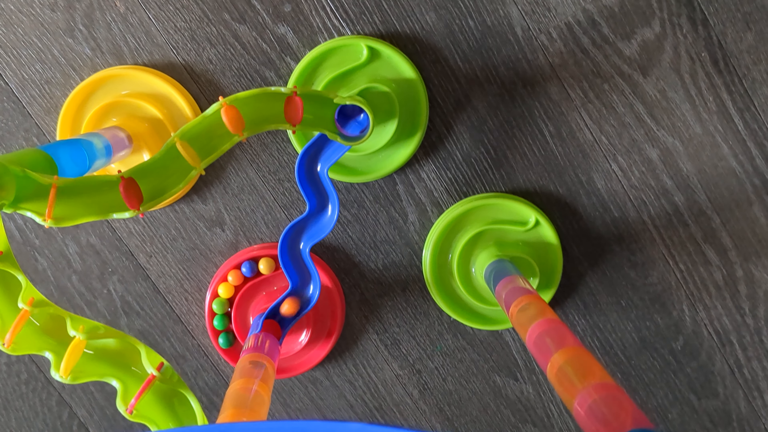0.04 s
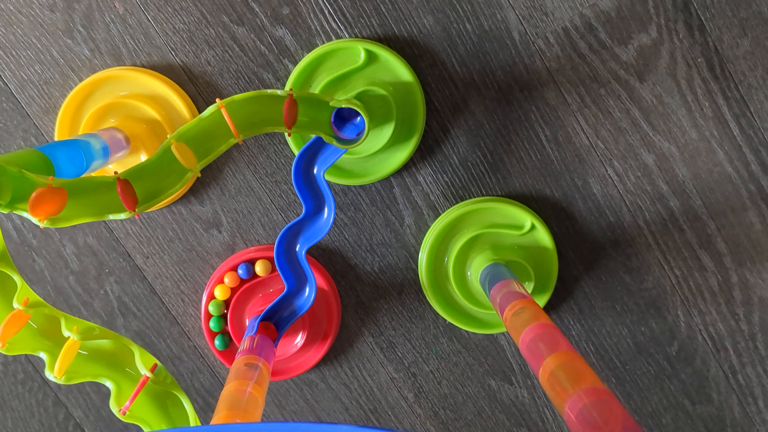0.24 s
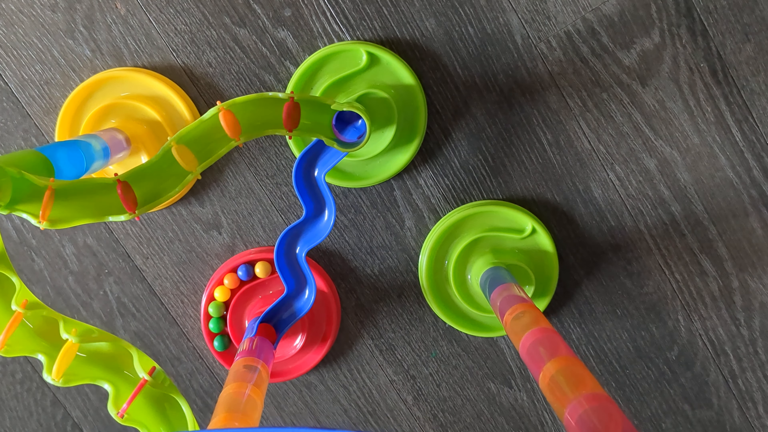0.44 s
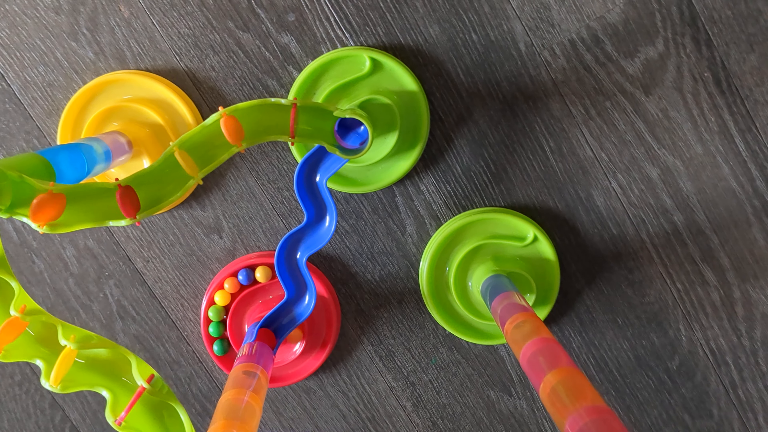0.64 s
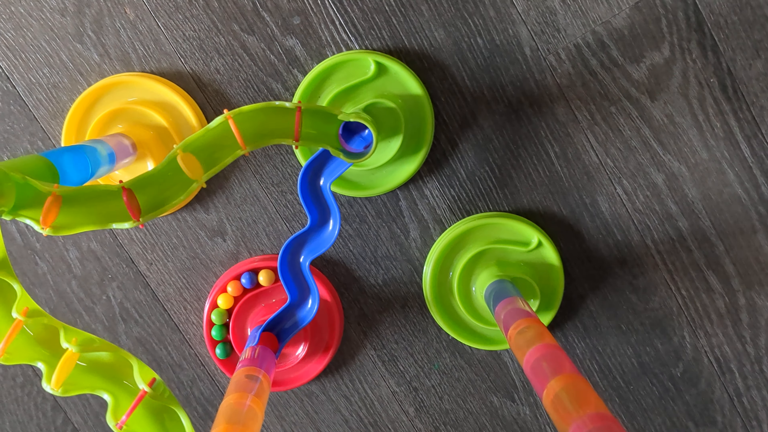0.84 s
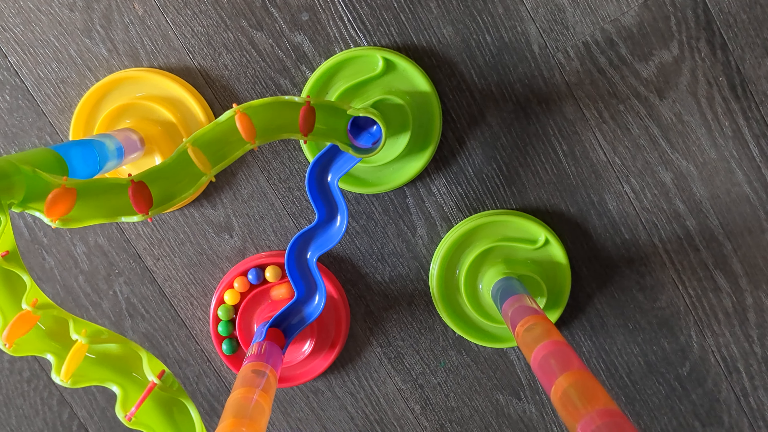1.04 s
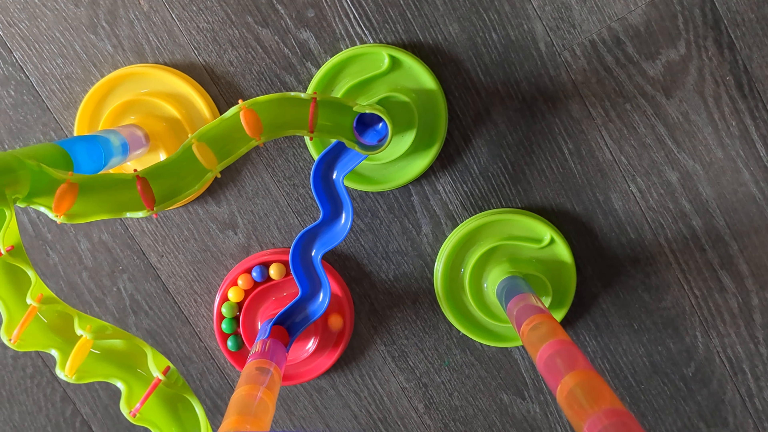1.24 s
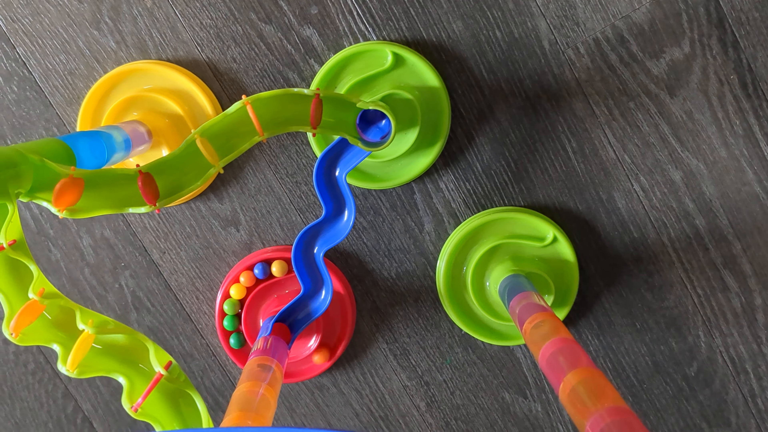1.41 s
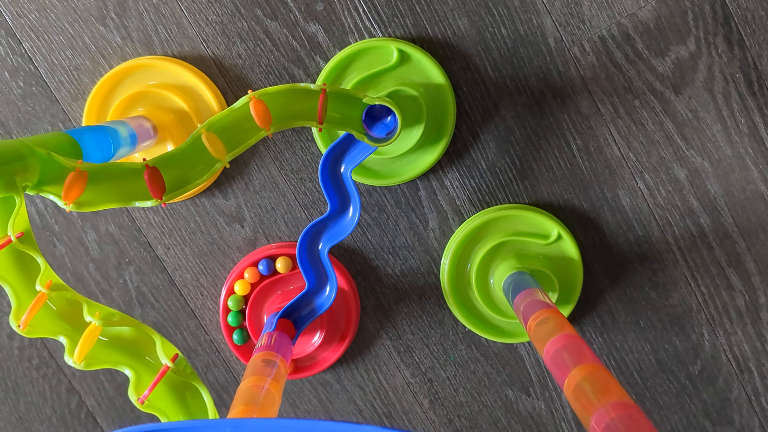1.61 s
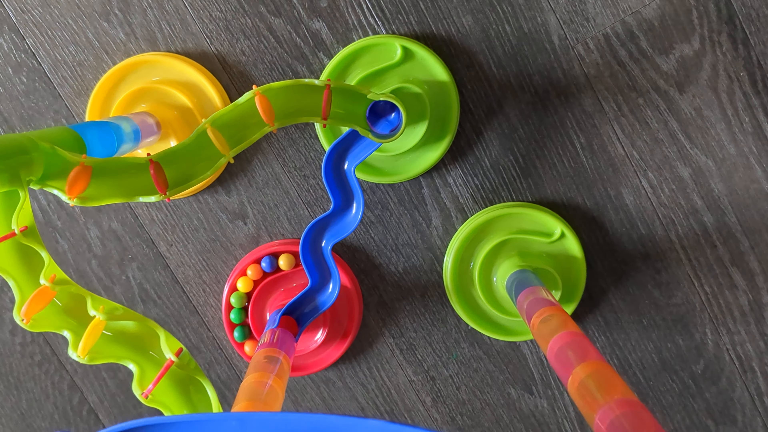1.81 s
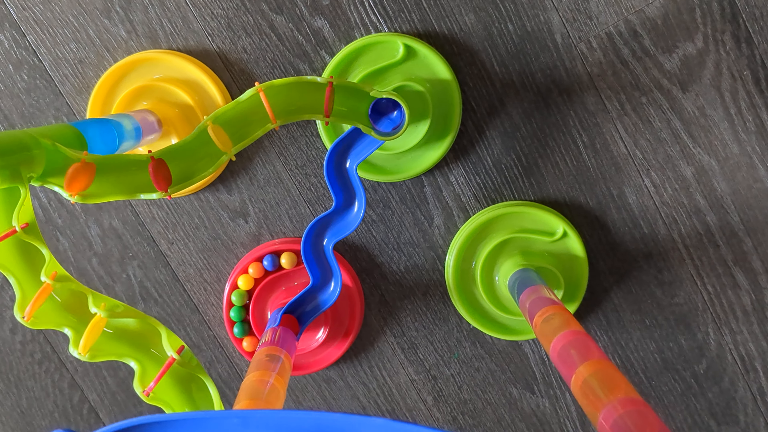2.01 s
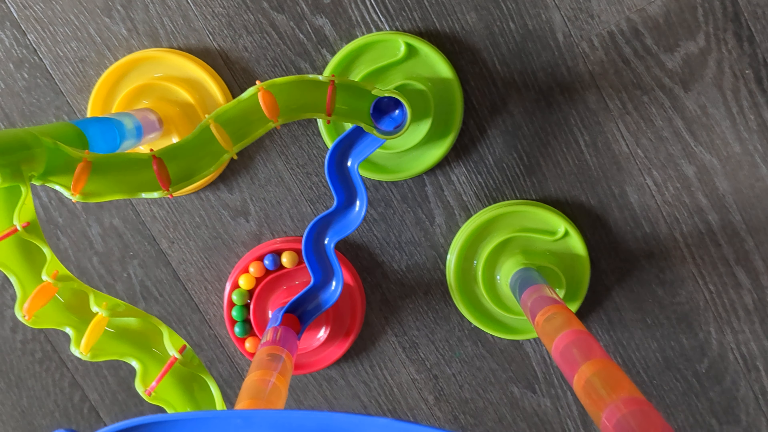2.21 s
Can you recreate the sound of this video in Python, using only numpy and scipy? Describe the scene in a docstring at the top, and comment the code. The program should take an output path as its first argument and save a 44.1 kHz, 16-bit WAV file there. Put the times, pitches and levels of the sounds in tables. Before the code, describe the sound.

Marbles roll down a plastic track, knocking, bouncing into a dish and clacking together.

```python
"""Marbles running down a plastic track on the hard floor of a small room, heard on a stereo pair.
They hum over tiny bumps in the plastic and knock across the ramp's joints. One clips the chute's rim,
drops into a dish, bounces ever faster, circles and clacks against the marbles resting there; another
drops into a hollow cup. Each blow rings the part it hits, and the near walls answer briefly."""
import sys
import numpy as np
from scipy import signal
from scipy.fft import rfft, irfft, next_fast_len
from scipy.io import wavfile
from scipy.ndimage import map_coordinates

SR = 44100
rng = np.random.default_rng(int(sys.argv[2]) if len(sys.argv) > 2 else 0)


def waveform_to_disk(signal):
    """Save audio, clipped to [-1, 1], as 16-bit WAV at the path in sys.argv[1]."""
    frames = np.transpose(np.atleast_2d(signal))
    scaled = np.clip(frames, -1, 1) * 32767
    samples = np.round(scaled).astype(np.int16)
    wavfile.write(sys.argv[1], SR, samples)


N = 103635
RADIATION_HZ = 364  # the small parts radiate little below this


def from_db(db):
    """Decibels to gain."""
    return 10 ** (np.asarray(db) / 20)


def at_hz(points, hz):
    """Read a spectrum on a log-frequency axis."""
    freqs, values = np.transpose(points)
    return np.interp(np.log(hz), np.log(freqs), values)


def on_bins(points, size):
    """Read a spectrum at every bin of an FFT."""
    return at_hz(points, np.maximum(np.arange(size // 2 + 1) * SR / size, 1))


def convolve(sound, response):
    """Pass a sound through a response."""
    return signal.fftconvolve(np.atleast_2d(sound), np.atleast_2d(response), axes=-1)[:, :N]


def minimum_phase(gains):
    """The causal response with these gains that gives up its energy soonest."""
    cepstrum = irfft(np.log(gains + 1e-9))
    i = np.arange(len(cepstrum))
    fold = np.where(i == 0, 1, 2 * (i < len(i) // 2))
    return irfft(np.exp(rfft(cepstrum * fold)))


def mic_pair(x, lag_s=.00003):
    """Sound reaches the left microphone a moment before the right."""
    late = np.arange(len(x)) - lag_s * SR
    return np.array([x, map_coordinates(x, [late], order=3, mode="grid-constant")])


# diffuse sound at the two microphones: f/Hz, correlation
LIKENESS = [(130, 0.63), (300, 0.95), (1200, 0.17), (2500, 0), (4500, 0.22), (8000, 0), (12000, 0.96)]
def noise_bands(size):
    """Yield (Hz, band): third octaves of flat noise, partly alike left and right."""
    edges = np.geomspace(20, 18000, 31)
    white = rfft(rng.standard_normal((2, size)))
    freqs = np.arange(size // 2 + 1) * SR / size
    for low, high in zip(edges, edges[1:]):
        hz = np.sqrt(low * high)
        alike = np.clip(at_hz(LIKENESS, hz), -.95, .95)
        inside = (freqs >= low) & (freqs < high)
        mid, side = irfft(white / abs(white) * inside, size) * np.sqrt(size / 2)
        yield hz, np.sqrt(1 + alike) * mid + np.sqrt(1 - alike) * np.array([side, -side])


def dying_noise(colour, t60s, rise_s, size):
    """A diffuse response: each band swells, dies away and carries the energy of its colour."""
    t, out = np.arange(size) / SR, 0
    for hz, band in noise_bands(size):
        shaped = band * (1 - np.exp(-t / rise_s)) * from_db(-60 * t / at_hz(t60s, hz))
        normalise = np.sqrt(2 * np.mean(band ** 2) / (np.sum(shaped ** 2) + 1e-20))
        out = out + shaped * normalise * from_db(at_hz(colour, hz))
    return out


def resonate(x, hz, width_hz):
    """A resonance with gain 1 at its peak."""
    r = np.exp(-np.pi * width_hz / SR)
    feedback = [1, -2 * r * np.cos(2 * np.pi * hz / SR), r * r]
    return signal.lfilter(np.array([1, 0, -1]) * (1 - r * r) / 2, feedback, x + 1e-18)


def rolling(level, tones, pitch=((0, 1),), taps_per_s=2500, spread_db=3, top_hz=7000):
    """A rolling marble taps tiny bumps at random and sets the plastic humming."""
    t, size = np.arange(N) / SR, 2 * N
    taps = (rng.random(size) < taps_per_s / SR) * rng.choice([-1, 1], size)
    taps = taps * from_db(spread_db * np.minimum(rng.exponential(1, size), 5))
    hum = sum((-1) ** k * from_db(db) * resonate(taps, hz, width)
              for k, (hz, width, db) in enumerate(tones))
    hum = signal.sosfilt(signal.butter(2, [RADIATION_HZ, top_hz], "band", fs=SR, output="sos"), hum)
    speed = np.interp(t, *np.transpose(pitch))
    hum = map_coordinates(hum, [np.cumsum(speed)], order=3)  # resampling bends the pitch
    return mic_pair(hum / hum.std() * from_db(np.interp(t, *np.transpose(level))))


def ring(modes, size=4096, spread_db=2.35):
    """Damped sines of alternating sign; their strengths vary with where the blow lands."""
    t, out = np.arange(size) / SR, 0
    for k, (hz, db, t60) in enumerate(modes):
        envelope = from_db(db + spread_db * rng.standard_normal() - 60 * t / t60)
        out = out + (-1) ** k * envelope * np.sin(2 * np.pi * hz * t)
    return out


def body(modes, colour, crack_t60_s, snap_db, low_cut_hz=RADIATION_HZ, crack_db=2, size=4096):
    """One blow: a snap and the main modes start at once, over a crack of fine, fast-dying modes."""
    gains = np.hypot(abs(rfft(ring(modes, size))), from_db(snap_db + on_bins(colour, size)))
    crack = dying_noise(colour, [(1000, crack_t60_s)], rise_s=.0002, size=size)
    response = mic_pair(minimum_phase(gains)) + from_db(crack_db) * crack
    return signal.sosfilt(signal.butter(4, low_cut_hz, "high", fs=SR, output="sos"), response)


def strike(hits, respond):
    """Contacts on one part, each with a fresh response; a softer one lasts longer and sounds duller."""
    out, k = np.zeros((2, N + SR)), np.arange(128)
    for s, db, *bright_hz in hits:
        push = (k + 1) * np.exp(-2 * np.pi * (bright_hz[0] if bright_hz else SR) * k / SR)
        blow = convolve(push / push.sum(), respond())
        start = int(s * SR)
        out[:, start:start + blow.shape[1]] += from_db(db) * blow
    return out[:, :N]


# room tone at the microphones: f/Hz, relative level/dB
ROOM_TONE = [(25, -104), (55, -31), (80, -30.5), (125, -26.5), (170, -33.5), (400, -39), (1000, -39.5),
             (3000, -37.5), (5200, -47), (7000, -44.5), (10000, -52.5), (13500, -63)]
def room_tone(hiss_db=-20, whine_db=-96):
    """Faint rumble and hiss all round, with a thin high whine."""
    hiss = sum(from_db(hiss_db + at_hz(ROOM_TONE, hz)) * band
               for hz, band in noise_bands(next_fast_len(N)))
    whine = resonate(rng.standard_normal((2, N)), hz=14900, width_hz=150)
    return hiss[:, :N] + from_db(whine_db) * whine / whine.std()


# hum of the slide: t/s, level/dB
SLIDE_ROLL = [(0, -52), (.09, -53.5), (.18, -67), (.25, -110)]
# its resonances: f/Hz, width/Hz, relative level/dB
SLIDE_TONES = [(930, 90, 1), (1680, 91, -2), (2770, 320, -2.5), (3900, 600, -13.5)]
def slide_roll():
    """Above the dish, a marble swerves down the wavy slide."""
    return rolling(SLIDE_ROLL, SLIDE_TONES)


# hum of the dish: t/s, level/dB
DISH_ROLL = [(0, -54.5), (.07, -52.5), (.14, -63), (.22, -63.5), (.7, -77), (.9, -63), (1.2, -70),
             (1.42, -60), (1.54, -53.5), (1.67, -59), (1.88, -65), (2.0, -72), (2.2, -82), (2.35, -102)]
# its resonances before the bend: f/Hz, width/Hz, relative level/dB
DISH_TONES = [(507, 88, 1.5), (669, 152, -1), (790, 102, -1)]
# their bend: t/s, pitch ratio
DISH_PITCH = [(0, 1.17), (0.152, 1.108), (1.399, 1.03), (1.651, 1.1), (1.769, .99), (1.9, 1.05)]
def dish_roll():
    """A marble circles the dish; the hum sinks as it slows."""
    return rolling(DISH_ROLL, DISH_TONES, DISH_PITCH)


# hum of the ramp: t/s, level/dB
RAMP_ROLL = [(0, -66), (.2, -74), (.45, -47.5), (.56, -62), (.6, -58), (.68, -55.5), (.8, -55.5),
             (.89, -48.5), (.96, -59), (1.05, -55.5), (1.13, -52), (1.3, -46.5), (1.4, -56), (1.5, -64),
             (1.8, -72), (2.2, -75.5), (2.35, -103)]
# its resonances: f/Hz, width/Hz, relative level/dB
RAMP_TONES = [(392, 128, -10.5), (660, 880, -14.5), (1114, 70, 5.5), (1304, 120, -2.5), (1660, 110, -9.5),
              (2280, 230, -12), (2940, 1200, -20.5), (4200, 1200, -22.5)]
def ramp_roll():
    """Marbles along the ramp set it humming in swells."""
    return rolling(RAMP_ROLL, RAMP_TONES)


# hum of the chute: t/s, level/dB
CHUTE_ROLL = [(0, -75), (.2, -80), (.8, -70), (.96, -60.5), (1.02, -53.5), (1.12, -48), (1.3, -58),
              (1.45, -65), (1.8, -71), (2.2, -72.5), (2.35, -81.5)]
# its resonances: f/Hz, width/Hz, relative level/dB
CHUTE_TONES = [(1790, 250, -0.5), (2210, 106, 7.5), (2600, 370, -10.5), (3130, 490, -7), (4060, 920, -14.5),
               (7000, 750, -19.5)]
def chute_roll():
    """A marble in the chute raises a brighter whirr."""
    return rolling(CHUTE_ROLL, CHUTE_TONES)


# knocks on the ramp: t/s, level/dB, brightness f/Hz
RAMP_HITS = [(.0015, -15, 3520), (.0188, -13.5, 5300), (.0285, -23, 4500), (.089, -16, 4300),
             (.0972, -26, 4470), (.135, -15, 2500), (.1625, -13.5, 3600), (.173, -10.5, 3470),
             (.5497, -15.5, 2220), (.5725, -19, 2500), (.6163, -10.5, 4200), (.637, -10.5, 3220),
             (.6498, -8, 5650), (.6615, -12, 7000), (.670, -24, 5000), (.7665, -19.5, 4200),
             (.868, -18.5, 4200), (1.0815, -5.5, 6000), (1.094, -15, 4000), (1.111, -12, 3800),
             (1.1345, -10.5, 2800), (1.1425, -31, 2800), (1.2385, -8.5, 2280), (1.2605, -5, 2600),
             (1.2738, -2.5, 2800), (1.291, -7, 2250), (1.303, -8.5, 2500), (1.5183, -20.5, 2210)]
# its modes: f/Hz, relative level/dB, t60/s
RAMP_MODES = [(593, -37.5, 0.058), (1082, -28.5, 0.027), (1237, -21, 0.018), (1364, -20.5, 0.019),
              (1723, -34.5, 0.041), (2255, -30.5, 0.028), (2897, -31, 0.013), (3850, -30, 0.014),
              (4500, -36, 0.044)]
# its crack: f/Hz, relative level/dB
RAMP_CRACK = [(200, -30.5), (700, -19.5), (2000, 0), (4500, -0.5), (5700, -10.5), (8000, -14),
              (11500, -13.5), (16000, -39.5)]
def ramp_knocks():
    """Marbles knock over the joints of the ramp."""
    return strike(RAMP_HITS, lambda: body(RAMP_MODES, RAMP_CRACK, crack_t60_s=.0236, snap_db=-4.5))


# clicks on the rim: t/s, level/dB
RIM_HITS = [(.2238, -4), (.2493, -7.5), (.279, -7)]
# its modes: f/Hz, relative level/dB, t60/s
RIM_MODES = [(996, -26.5, 0.014), (1340, -26, 0.064), (1870, -21.5, 0.019), (2500, -24, 0.0074),
             (3220, -35, 0.0067), (3680, -39, 0.01)]
# its crack: f/Hz, relative level/dB
RIM_CRACK = [(200, -35), (1000, -15), (4000, 11.5), (5700, -12), (9000, -11.5), (12500, -14), (16000, -43)]
def rim_clicks():
    """A marble clips the rim of the chute with a hard snap."""
    return strike(RIM_HITS, lambda: body(RIM_MODES, RIM_CRACK, crack_t60_s=.021, snap_db=2.5))


# bounces in the dish: t/s, level/dB, brightness f/Hz
DISH_HITS = [(.2573, -2, 11700), (.3069, -7, 11300), (.3594, -10.5, 11500), (.3978, -12.5, 7600),
             (.4255, -15.5, 6350), (.4452, -18, 8000), (.4595, -23, 7000), (.4705, -32, 5000)]
# its modes: f/Hz, relative level/dB, t60/s
DISH_MODES = [(363, -49.5, 0.025), (596.6, -27.5, 0.074), (1097, -14.5, 0.023), (1332, -5.5, 0.014),
              (1606, -15, 0.019), (1775, -16, 0.033), (2270, -18.5, 0.044), (2560, -15, 0.017),
              (2800, -16, 0.015), (3143, -13.5, .018), (4000, -14, 0.012), (4250, -18.5, .009),
              (4813, -20, 0.026), (6850, -16.5, 0.0043), (11800, -9.5, 0.003)]
# its crack: f/Hz, relative level/dB
DISH_CRACK = [(200, -22.5), (900, 11), (2000, -21), (4500, 9), (5700, -2), (8000, 1), (9500, -7),
              (12000, 4.5), (14000, -20.5), (16000, -22)]
def dish_bounces():
    """A marble drops into the dish and bounces ever faster and fainter."""
    return strike(DISH_HITS, lambda: body(DISH_MODES, DISH_CRACK, crack_t60_s=.016, snap_db=-10.5))


# soft low bumps: t/s, level/dB
BUMPS = [(.698, -54.5), (.935, -54.5)]
# modes of a thud at floor level: f/Hz, relative level/dB, t60/s
THUD_MODES = [(116, -2, 0.059), (246.6, -7.5, 0.09)]
def floor_thumps(bounce_db=-49.5):
    """Each bounce thumps the dish against the floor; two soft bumps follow."""
    thud = lambda: mic_pair(ring(THUD_MODES))
    return from_db(bounce_db) * strike(DISH_HITS, thud) + strike(BUMPS, thud)


# blows in the cup: t/s, level/dB, brightness f/Hz
CUP_HITS = [(1.171, 1.5, 12690), (1.2277, 0.5, 12300)]
# its modes: f/Hz, relative level/dB, t60/s
CUP_MODES = [(560, -34, 0.02), (800, -29, 0.017), (1105, -24, 0.02), (1360, -21, 0.014), (2210, -40, 0.075),
             (4130, -24.5, 0.014), (4310, -32.5, 0.018)]
# its crack: f/Hz, relative level/dB
CUP_CRACK = [(300, -34), (700, -2.5), (2000, -3), (4500, 2.5), (5700, -13), (9500, -9), (12000, -13.5),
             (16000, -35)]
def cup_drop():
    """A marble drops into a hollow cup of the track and strikes twice."""
    return strike(CUP_HITS,
                  lambda: body(CUP_MODES, CUP_CRACK, crack_t60_s=.024, snap_db=-5, low_cut_hz=500))


# thin ring of a rim: t/s, level/dB
RIM_ROLL = [(1.35, -71), (1.52, -62), (1.65, -65.5), (1.86, -65), (1.95, -72.5), (2.2, -74), (2.35, -86)]
# its resonance before the bend: f/Hz, width/Hz, relative level/dB
RIM_TONES = [(1476, 37, 0)]
# bends of the ring and its overtone: t/s, pitch ratio
RIM_PITCH = [(1.499, 1), (1.8, 0.95), (1.9, .97), (2.0, 1)]
OVERTONE_PITCH = [(1.651, 0.9), (1.85, 1.015), (2.1, 0.89)]
def rim_roll(overtone_hz=2117, overtone_width_hz=18, overtone_db=-5.5):
    """A marble runs round a rim; the ring sinks while its overtone climbs, then both turn back."""
    overtone = rolling(RIM_ROLL, [(overtone_hz, overtone_width_hz, 0)], OVERTONE_PITCH)
    return rolling(RIM_ROLL, RIM_TONES, RIM_PITCH) + from_db(overtone_db) * overtone


# glass on glass in the dish: t/s, level/dB
CLACKS = [(1.8855, 0.5), (1.8905, -6), (1.902, -7.5), (1.9065, -8)]
# modes of a clack: f/Hz, relative level/dB, t60/s
GLASS_MODES = [(1370, -50, 0.014), (2100, -64, 0.018)]
# its crack: f/Hz, relative level/dB
GLASS_CRACK = [(200, -19.5), (450, -13), (2000, -18), (4700, -29.5), (6800, -19), (9500, -29), (11500, -46),
               (16000, -51.5)]
def marble_clacks():
    """The circling marble jostles those at rest."""
    return strike(CLACKS, lambda: body(GLASS_MODES, GLASS_CRACK, crack_t60_s=.038, snap_db=-9))


# balance across the pair: f/Hz, left minus right level/dB
BALANCE = [(1400, -0.5), (3000, -2.5), (4700, -5), (6800, 18), (9500, 23), (12000, -2.5)]
def mic_facing(x):
    """The microphones face the blows differently and colour them; their summed power stays."""
    ratio = from_db(on_bins(BALANCE, size=1024))
    right = np.sqrt(2 / (1 + ratio ** 2))
    return convolve(x, [minimum_phase(ratio * right), minimum_phase(right)])


# colour of the small room: f/Hz, level/dB
ROOM_COLOUR = [(100, 4.5), (300, 0.5), (600, -8.5), (1200, -5), (2500, -4), (4200, -6), (7000, -2.5),
               (10000, -6.5), (12500, -2), (14000, -15)]
# decay of its tail: f/Hz, t60/s
ROOM_T60 = [(150, 0.54), (1200, 0.49), (4000, 0.46), (8000, 0.43), (14000, 0.35)]
def room(x, delay_s=.004, rise_s=.0026, early_db=-3, early_t60_s=.048):
    """Quick reflections off floor and track, then the tail, all by paths at least 1.4 m longer."""
    early = dying_noise(ROOM_COLOUR, [(1000, early_t60_s)], rise_s, size=32768)
    tail = dying_noise(ROOM_COLOUR, ROOM_T60, rise_s, size=32768)
    response = from_db(early_db) * early + tail
    return convolve(x, np.pad(response, ((0, 0), (int(delay_s * SR), 0))))


def scene():
    """Blows and rolling reach the pair directly and by way of the room."""
    rolls = slide_roll() + dish_roll() + ramp_roll() + chute_roll() + rim_roll()
    ramp, rim, dish = ramp_knocks(), rim_clicks(), dish_bounces()
    thumps, cup, glass = floor_thumps(), cup_drop(), marble_clacks()
    direct = mic_facing(ramp + rim + dish + cup + glass) + thumps + rolls
    room_feed = ramp + from_db(-3) * rim + from_db(-2) * dish + from_db(1.7) * cup + glass
    return direct + room(room_feed + thumps + rolls) + room_tone()


def record(dry, cutoff_hz=16400):
    """A steep low-pass takes off the very top."""
    return signal.sosfilt(signal.ellip(10, .1, 80, cutoff_hz, fs=SR, output="sos"), dry)


dry = scene()
out = record(dry)
waveform_to_disk(out)
```